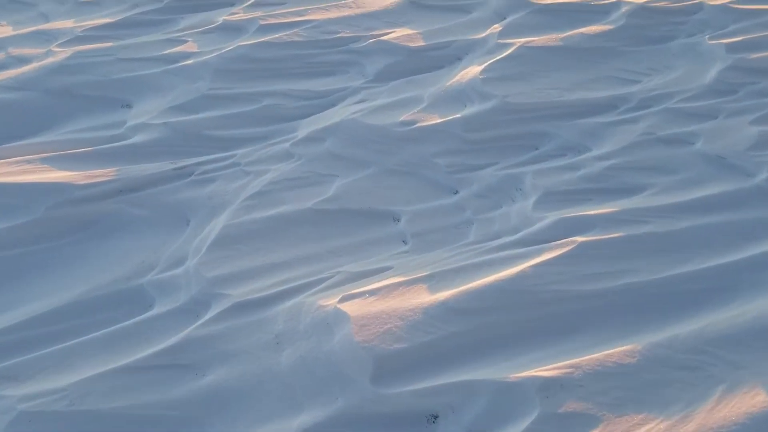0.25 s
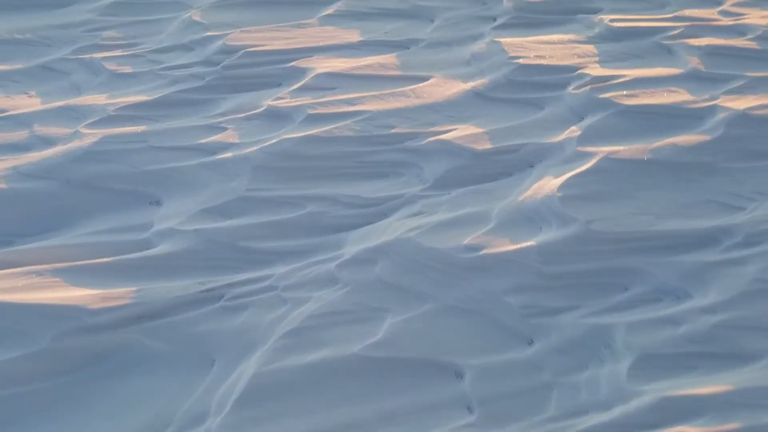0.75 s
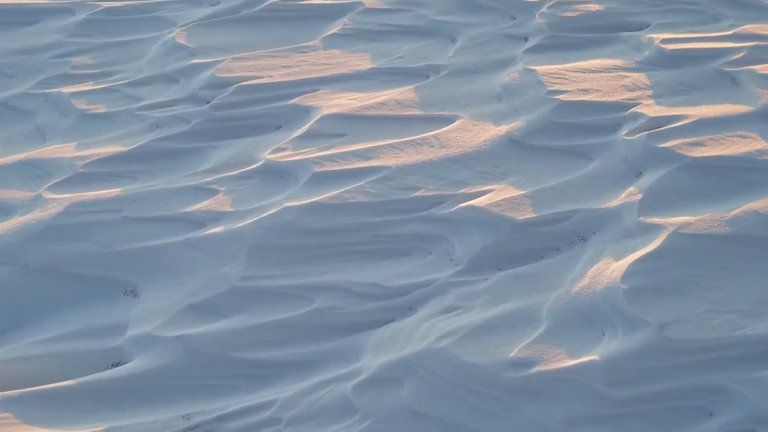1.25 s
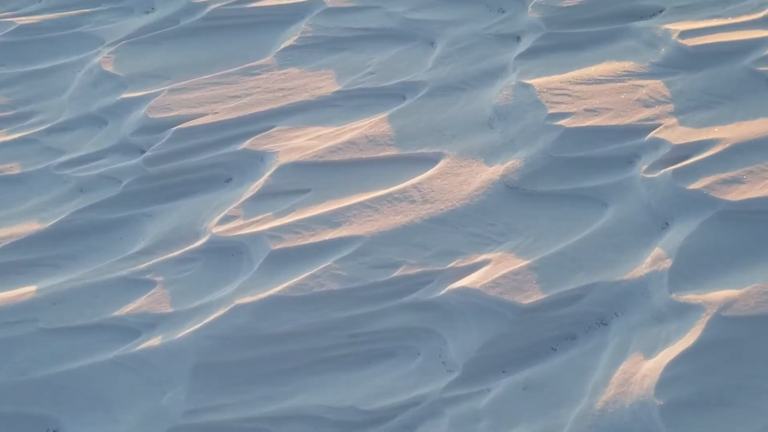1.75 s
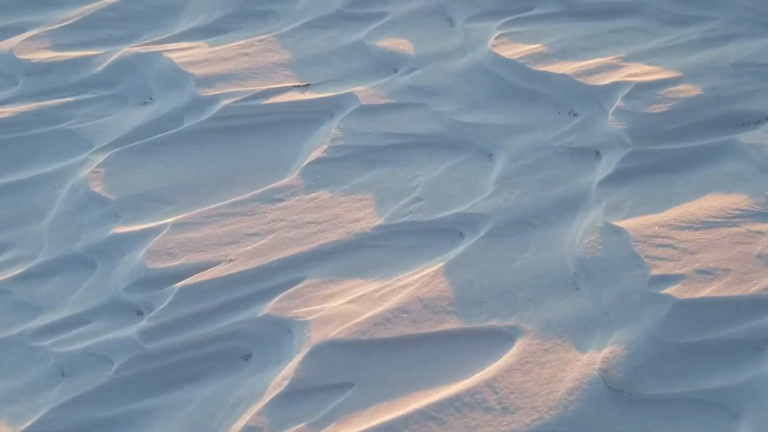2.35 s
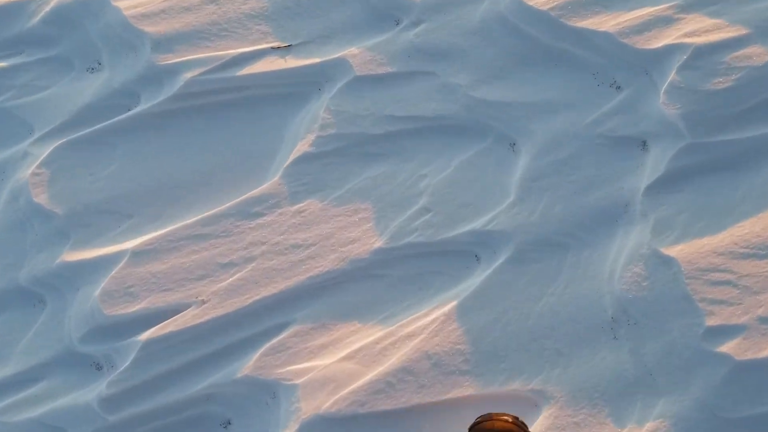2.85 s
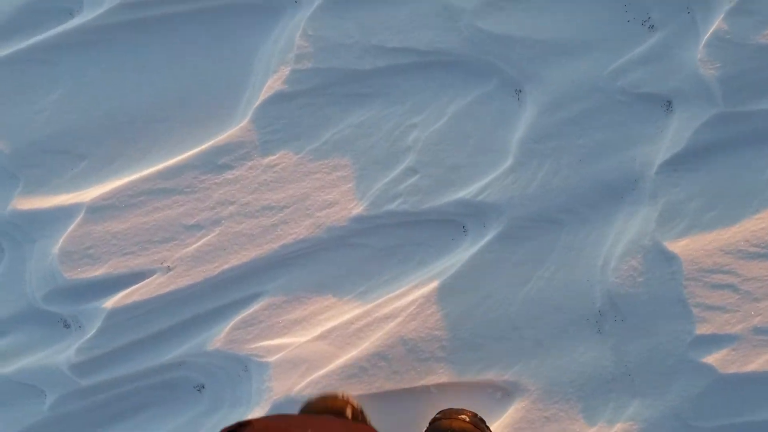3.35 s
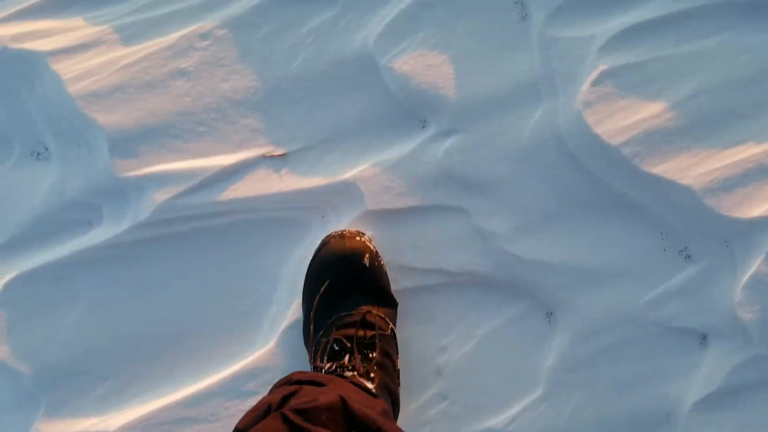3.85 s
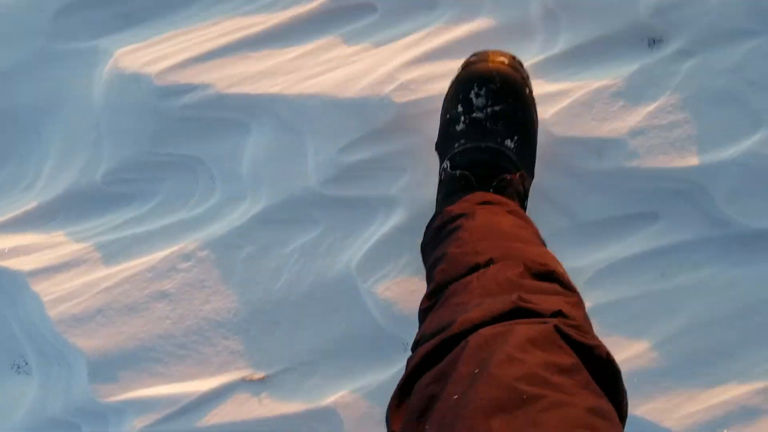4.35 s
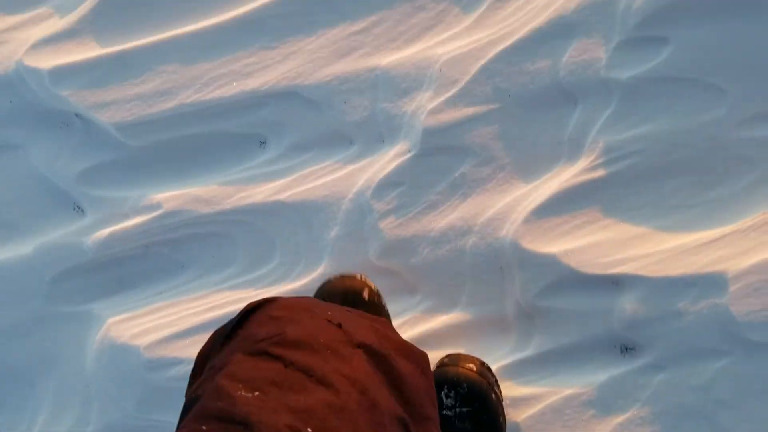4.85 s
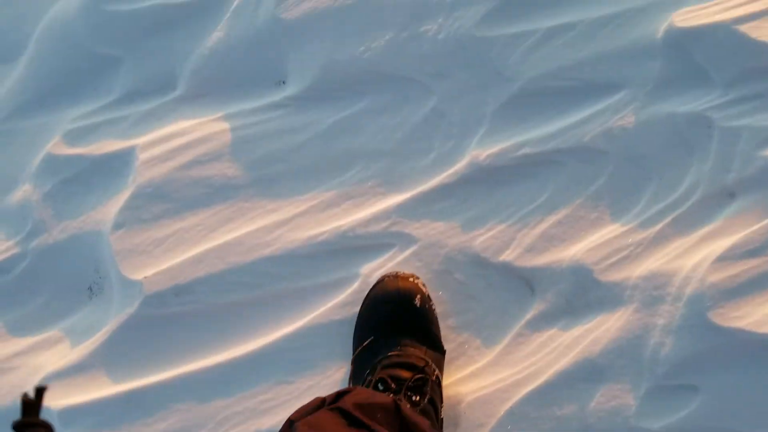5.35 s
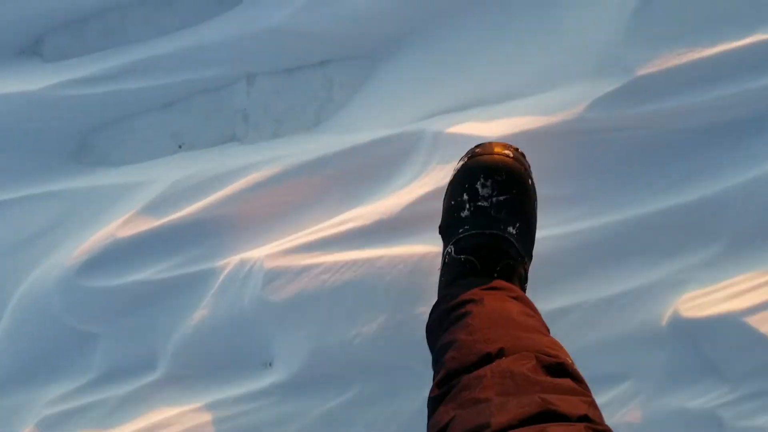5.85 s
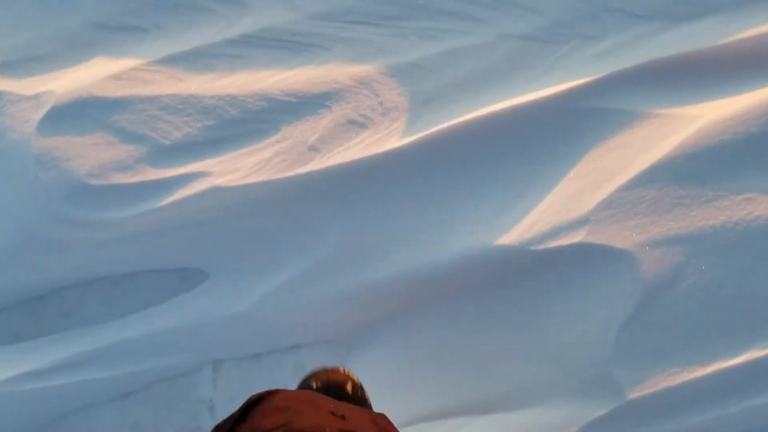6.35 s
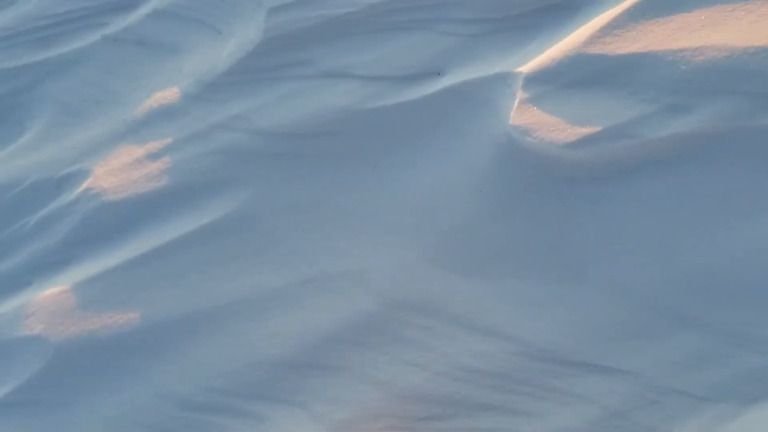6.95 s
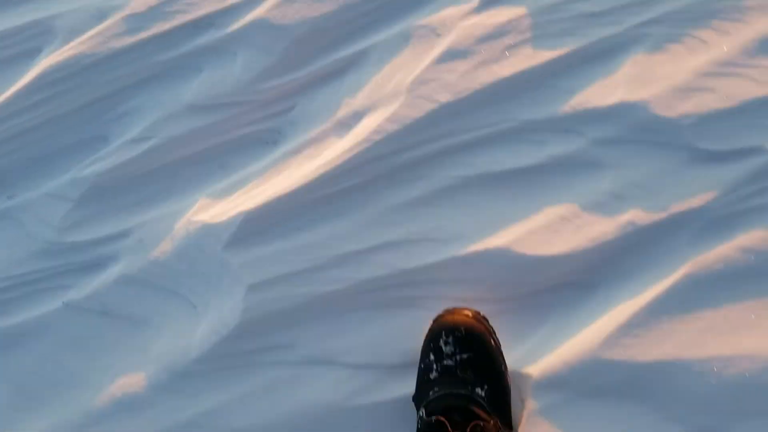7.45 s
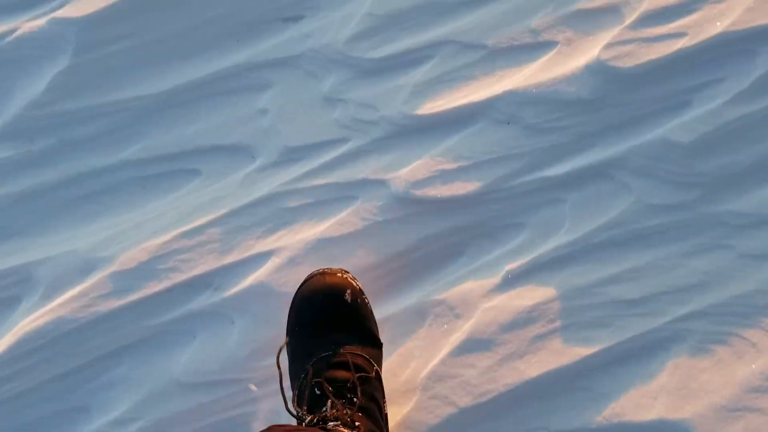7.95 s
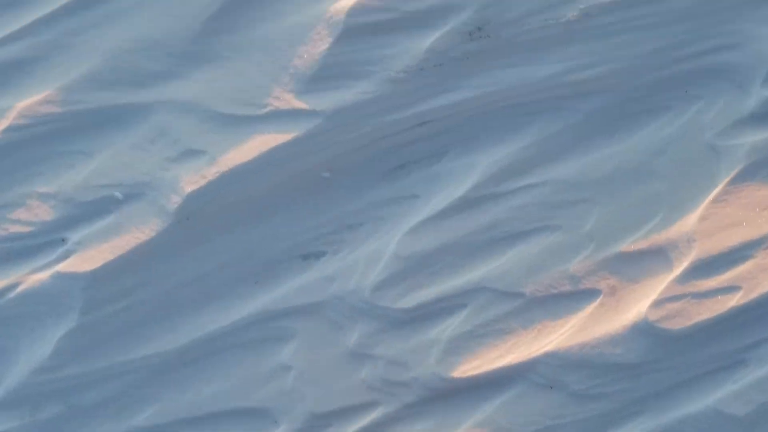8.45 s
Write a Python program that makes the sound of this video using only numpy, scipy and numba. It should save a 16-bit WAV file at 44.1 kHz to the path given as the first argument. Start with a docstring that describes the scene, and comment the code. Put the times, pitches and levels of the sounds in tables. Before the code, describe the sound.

Someone walks at a slow, steady pace over hard, wind-packed snow. Each boot breaks the crust in small snapping jerks, then grinds down with a squeaky crunch, a crisp hiss of crystals and a soft thud. The squeaks rise in pitch in the later steps as the snow gets firmer. The sound is close, in stereo, in quiet open air with no echo.

```python
"""Slow, squeaky crunching of boots on hard wind-packed snow in bitter cold.
Under each boot the crust gives way in short jerks and longer grinding slides. Breaking crystals hiss
and rasp, the slab squeaks at a pitch that climbs as the snow gets firmer, and the weight thuds softly.
Open air, no echo; stereo through two microphone ports."""
import sys
import numpy as np
from scipy import signal
from scipy.fft import rfft, irfft, next_fast_len
from scipy.io import wavfile
from scipy.ndimage import map_coordinates
from numba import njit

SR = 44100
rng = np.random.default_rng(int(sys.argv[2]) if len(sys.argv) > 2 else 0)


def to_wav(s):
    """Save 16-bit WAV."""
    ch = np.atleast_2d(s).T  # columns
    pcm = np.round(np.clip(ch, -1, 1) * 32767)  # PCM
    wavfile.write(sys.argv[1], SR, pcm.astype(np.int16))


N = 384552

# slab under the boot: t/s, squeak f/Hz, overtone gain/dB, rasp gain/dB, thud gain/dB
SNOW_SLAB = [(0, 380, -7.5, 4.5, 3), (.95, 540, -4.5, 7, 1.5), (1.4, 470, -4, 3, -3),
             (2.7, 582, -3.5, -1, -5.5), (3.08, 463, -2.5, -4, -5.5), (3.8, 550, -3, -2.5, -4.5),
             (4.4, 572, -7, 0, -2), (5.1, 564, -6, 1.5, -2), (5.3, 760, -39, 5, -6),
             (5.88, 792, -26, 0, -0.5), (6.1, 933, -17, 0.5, -6.5), (6.55, 993, -4, 5, -4),
             (6.7, 1190, -43, -3.5, -7), (6.85, 1130, -23, 7.5, -20), (7.1, 1170, -34, 6, -13),
             (7.46, 1550, -25, -2, -3), (7.53, 1700, -22, -2, -12.5), (8.15, 1756, -13, 2, -9.5),
             (8.72, 1730, -37, -5, -6)]


def amp(db):
    """dB to gain."""
    return 10 ** (np.asarray(db) / 20)


def unit(x):
    """Scale to rms 1."""
    return x / np.sqrt(np.mean(x ** 2) + 1e-20)


def along(points, hz):
    """Interpolate (f/Hz, value) points on a log axis."""
    f, values = np.transpose(points)
    return np.interp(np.log(hz + 1), np.log(f + 1), values)


def curves(rows):
    """Per-sample curve for each column after t/s."""
    times, *columns = np.transpose(rows)
    return [np.interp(np.arange(N) / SR, times, column) for column in columns]


def filtered(x, response):
    """Apply a complex frequency response."""
    size = next_fast_len(N + SR // 2)
    return irfft(rfft(x, size) * response(np.fft.rfftfreq(size, 1 / SR)), size)[..., :N]


def colour(x, spectrum):
    """Shape by (f/Hz, level/dB) points, rms 1."""
    return unit(filtered(x, lambda f: amp(along(spectrum, f))))


def smooth(x, pole):
    """One-pole low-pass."""
    return signal.lfilter([1 - pole], [1, -pole], x)


def wobble(rate_hz):
    """Smooth random curve."""
    return map_coordinates(rng.standard_normal(N // 10), [np.arange(N) * rate_hz / SR])


def grains(rate_hz, spread_db):
    """Two independent noises (mid, side) under one lumpy envelope."""
    return unit(amp(spread_db * wobble(rate_hz)) * rng.standard_normal((2, N)))


@njit
def two_pole(x, a1, a2):
    """Band-pass with per-sample coefficients."""
    y = np.zeros_like(x)
    for c in range(x.shape[0]):
        for i in range(2, x.shape[1]):
            y[c, i] = (1 - a2[i]) / 2 * (x[c, i] - x[c, i - 2]) + a1[i] * y[c, i - 1] - a2[i] * y[c, i - 2]
    return y


def resonate(x, hz, q, knocks=0):
    """Two-stage moving resonance, near unit gain for white noise; knocks skip stage one to ring at once."""
    radius = np.exp(-np.pi * hz / q / SR)
    a1, a2 = (1 + radius ** 2) * np.cos(2 * np.pi * hz / SR), radius ** 2
    return two_pole(two_pole(x, a1, a2) + knocks, a1, a2) * np.sqrt(2 * SR * q / (np.pi * hz))


def breaking_crust(slab_hz):
    """Crust gives way under the boot: hiss envelope, squeak drive envelope, snap impulses."""
    # sudden jerks: t/s, length/ms, hiss/dB, drive re hiss/dB
    jerks = [(0.017, 22, -39.5, 10.5), (0.046, 14, -36.5, 10), (0.278, 8.8, -42.5, 9),
             (0.359, 28, -41.5, 14), (0.0, 21, -47, -2.5), (0.553, 7.3, -43.5, -5), (0.604, 9.7, -42.5, 12),
             (0.686, 21, -41.5, 6), (0.723, 23, -39.5, 6), (1.183, 15.5, -35.5, -17), (1.208, 14, -36.5, 8),
             (1.234, 26, -40, 10.5), (1.278, 19, -37.5, 9), (1.316, 8.5, -46.5, 12),
             (1.334, 16, -37.5, 7.5), (1.375, 10, -35, 4.5), (1.455, 22, -36, 5), (1.767, 35, -38, 14),
             (2.423, 15, -36.5, 8), (2.449, 5.3, -37, 11.5), (2.477, 8.1, -47.5, 9), (2.605, 22, -49.5, 5),
             (2.649, 15, -48, 5), (2.671, 8.2, -39, 7.5), (2.725, 7.9, -35, 4.5), (2.769, 15, -34.5, 2),
             (2.802, 22, -35, 6), (2.83, 22, -32.5, 3), (2.856, 23, -33, 2), (2.885, 25, -31, -3),
             (2.914, 17, -32, 2), (2.936, 21, -35, 10), (3.459, 13, -47.5, -14), (3.481, 33, -35.5, 7.5),
             (3.849, 14, -30, 10.5), (3.911, 5, -48.5, 5), (3.927, 6.2, -38, -19), (4.075, 10, -57.5, 8),
             (4.124, 7.2, -56.5, 8), (4.292, 8.2, -41.5, -3), (4.626, 1.8, -50, -4), (4.65, 14, -36, 12.5),
             (4.716, 22.5, -39, 10), (4.749, 26, -38, 13.5), (4.784, 25, -36, 10.5),
             (4.808, 23, -36.5, 17.5), (4.85, 21.6, -35.5, 13.5), (4.887, 17, -35, 9),
             (4.945, 16, -35, 5.5), (4.982, 28, -35, 8.5), (5.397, 9, -33, 7), (5.426, 8.2, -35, 13.5),
             (5.445, 39, -34.5, 17), (5.49, 31, -30, 8.5), (5.534, 3.4, -32, 4), (5.563, 6.4, -34, 4),
             (5.614, 9.5, -34, 3), (5.669, 7.8, -32.5, 4), (5.706, 12, -36, 6.5), (5.806, 6.5, -45, 4),
             (5.825, 11, -35, 4), (5.868, 13, -33, 6.5), (5.884, 9.2, -34, 9.5), (6.192, 3, -36, 2),
             (6.321, 2, -44.5, -2.5), (6.371, 3, -43, -5), (6.4, 2.7, -41, -4), (6.444, 2.3, -38.5, 1.5),
             (6.475, 3.5, -38.5, 5), (6.495, 21, -38.5, 9.5), (6.523, 44, -34, 5.5),
             (6.703, 3, -28.5, 10.5), (6.731, 3, -33, 13.5), (6.827, 3, -38, 12), (6.931, 18.5, -33.5, 9),
             (7.037, 3, -55, 3), (7.078, 18, -34.5, 9.5), (7.122, 30.5, -32.5, 9), (7.166, 13.5, -31.5, 1),
             (7.196, 18, -33.5, 7), (7.233, 26, -34.1, 7.5), (7.274, 18.5, -33, 5), (7.304, 28, -33, 4),
             (7.666, 4.2, -46, -6), (7.682, 4.3, -43, 3), (7.7, 8, -33.5, 7), (7.788, 9.8, -33, 9),
             (7.808, 9.5, -44, 2), (7.823, 18, -32, 1), (7.843, 10, -33.5, 13.5), (7.875, 15, -32.5, 9.5),
             (7.888, 13, -35, 9.5), (7.92, 8.6, -33.5, 6), (7.951, 11, -30, 3), (7.987, 9.3, -36.5, 6),
             (8.018, 8, -45, 11), (8.043, 7.1, -41, 9), (8.214, 8.8, -33.5, 5), (8.24, 7.2, -34.5, -1),
             (8.26, 4.5, -35.5, 3.5), (8.276, 9.7, -39.5, -1), (8.295, 5.3, -36.5, 9.5),
             (8.316, 7.3, -34.5, -1.5), (8.336, 6.2, -34.5, 5), (8.36, 8.8, -36, 8.5),
             (8.393, 4.9, -34, 3.5), (8.424, 6.4, -36, 5.5), (8.506, 6.6, -35, -0.5), (8.531, 9, -36, 5.5),
             (8.583, 9.6, -33.5, -3), (8.608, 6.8, -34, 1.5)]
    # slides under full weight: t/s, swell/s, length/s, hiss/dB x3, drive re hiss/dB x3 (entry, peak, end)
    slides = [(0.044, .1, 0.22, -41, -39, -41, 6.5, 12, 18),
              (0.285, 0.028, 0.052, -41.5, -38.5, -39.5, 16, 12.5, 11.5),
              (0.69, 0.11, 0.3, -54.5, -37.5, -42, 20, 6, 5),
              (0.906, 0.037, 0.27, -40.5, -40.5, -42, -2, 14, 15),
              (1.356, 0.089, 0.087, -42.5, -37.5, -39.5, 2, 9, 8),
              (1.473, 0.035, 0.24, -45.5, -35, -39.5, 17, 3.5, 14.5),
              (2.115, 0.04, 0.29, -42, -35, -36.5, 11, -0.5, 15.5),
              (2.965, 0.081, .16, -36, -34, -39, 10, 5.5, 16),
              (3.523, 0.24, 0.3, -38.5, -31.5, -36.5, 9.5, 1, 12),
              (4.303, 0.045, 0.27, -42, -33, -38, 13.5, 2, 15),
              (5.02, 0.17, 0.35, -37.5, -35.5, -34.5, 10.5, 6.5, 10.5),
              (5.896, 0.12, 0.25, -34, -30.5, -37.5, -3, 5.5, 14),
              (6.575, 0.12, .33, -37, -28.5, -35.5, 2, -1.5, 6),
              (7.336, 0.15, 0.17, -38.5, -29.5, -35, 8, -26, -8),
              (7.509, 0.043, 0.12, -35, -34.5, -35, 4, 5.5, 10),
              (7.705, 0.03, 0.068, -32, -35.5, -36, 1, 8.5, 7.5),
              (7.959, 0.3, 0.232, -36, -30.5, -31.5, -18, 3, 12.5),
              (8.621, 0.076, .2, -36, -33, -14, -14, -27, -30)]
    # unloaded boot brushing the surface: centre t/s, half length/s, hiss/dB
    brushes = [(1.811, 0.068, -46.5), (2.11, 0.012, -54), (2.536, 0.051, -49.5), (3.288, 0.073, -45),
               (3.96, 0.096, -50.5), (4.288, 0.022, -54), (6.253, 0.04, -49), (6.293, 0.026, -50.5),
               (8.395, 0.079, -47.5)]
    # rows: hiss, drive
    rise_s = np.array([[.0005], [.0004]])
    sag_t60_s, fade_t60_s = np.array([[.5], [.12]]), np.array([[.022], [.06]])
    power = np.zeros((2, N + SR))

    def add_break(start_s, t, level_db, decay_db):
        shape = (1 - np.exp(-t / rise_s)) * amp(-decay_db)
        power[:, round(start_s * SR):][:, :len(t)] += (amp(level_db) * shape) ** 2

    t = np.arange(SR) / SR
    for start_s, swell_s, length_s, entry_db, peak_db, end_db, *above_db in slides:
        stages_s = [0, min(swell_s, length_s), length_s]
        hiss_db = np.interp(t, stages_s, [entry_db, peak_db, end_db])
        drive_db = hiss_db + np.interp(t, stages_s, above_db)
        add_break(start_s, t, [hiss_db, drive_db], 60 * np.maximum(t - length_s, 0) / fade_t60_s)
    power[:, :N] *= amp(1.2 * wobble(55)) ** 2  # sole judders on the crust

    snaps = np.zeros((2, N))  # rows: mid, side; one push opens each jerk, mid only
    snap_db, snap_lag_s = 20, .0013
    t = t[:SR // 4]
    for start_s, length_ms, hiss_db, above_db in jerks:
        held_s = np.minimum(t, length_ms / 1000)
        drive_db = hiss_db + above_db
        add_break(start_s, t, [[hiss_db], [drive_db]], 60 * (held_s / sag_t60_s + (t - held_s) / fade_t60_s))
        snaps[0, round((start_s + snap_lag_s) * SR)] = amp(drive_db + snap_db)

    # crumbs trickle after each break; drifting crystals set the floor
    crumb_db, crumb_t60_s, drift_db = -14.5, .64, -63
    hiss_power, drive_power = power[:, :N]
    trickle = smooth(hiss_power, pole=amp(-60 / (crumb_t60_s * SR)) ** 2)
    crumbs = amp(crumb_db) ** 2 * trickle + amp(drift_db) ** 2
    hiss_power += crumbs
    drive_power += crumbs * amp(-1.5 - 7.5 * np.log2(slab_hz / 600)) ** 2  # firm slab hardly rings
    t = np.arange(N) / SR
    for centre_s, half_s, hiss_db in brushes:
        hiss_power += amp(hiss_db) ** 2 * np.exp(-((t - centre_s) / half_s) ** 4)
    return np.sqrt(hiss_power), np.sqrt(drive_power), snaps


def crystal_hiss(hiss):
    """Fine crystals break: bright, even noise."""
    # hiss spectral density: f/Hz, level/dB
    spectrum = [(1290, -48), (2200, -9.5), (2840, -8), (3980, -6), (4840, -12.5), (7310, -10), (8470, -17),
                (9910, -11.5), (11400, -3.5), (12700, -7), (13400, -9.5), (15700, -19.5)]
    return amp(-1.5) * hiss * colour(grains(500, spread_db=.5), spectrum)


def grain_rasp(hiss, drive, slab_hz):
    """Uneven grains break; under load they ring a sole rib whose pitch jumps about."""
    # rasp spectral density: f/Hz, level/dB
    spectrum = [(150, -19.5), (350, -3.5), (1000, -1), (1600, 0), (2300, 0), (2900, -7), (5000, -19)]
    rasp = colour(grains(350, spread_db=2.5), spectrum)
    load = np.minimum(drive / hiss, 1) ** 2
    rib = resonate(grains(250, spread_db=2), hz=1700 * 2 ** (.22 * wobble(60)), q=4)
    rasp += amp(-5) * load * rib
    low = filtered(rasp, lambda f: 1 / (1 + (f / 950) ** 8))
    low_gain = np.minimum(650 / slab_hz, 1) ** 1.16  # firm snow loses the lows
    return hiss * (rasp - low + low * low_gain)


def small_cracks(drive, rate_hz, gain_db):
    """Random impulses all through the breaking, mid only."""
    chance, size = rng.random((2, N))
    impulses = drive * amp(gain_db) * (chance < rate_hz / SR) * (2 * size - .5)
    return np.array([impulses, np.zeros(N)])


def slab_squeak(drive, snaps, hz, overtone_db):
    """Breaking rings the slab and a broad overtone; firmer snow is higher and purer."""
    q = 2.78 * (hz / 600) ** .71
    squeak = resonate(amp(-1.5) * drive * grains(120, spread_db=2), hz, q, knocks=-snaps)
    overtone_drive = amp(overtone_db) * (drive * grains(150, spread_db=1.5) - snaps)
    return squeak + resonate(overtone_drive, 2.47 * hz, q=1.01)


def boot_thud(hiss):
    """The boot's weight follows the breaking sluggishly: low noise."""
    # thud spectral density: f/Hz, level/dB
    spectrum = [(15, -44), (25, -13.5), (81, 3), (213, -5.5), (352, -4.5), (399, -8.5), (500, -9),
                (650, -7), (1100, -120)]
    lag_s = .0034
    weight = np.sqrt(smooth(hiss ** 2, pole=np.exp(-1 / (lag_s * SR))))
    return weight * colour(grains(30, spread_db=3), spectrum)


def crust_drop(snaps, hz):
    """The crust drops as it snaps: a short, unpitched pull of air."""
    return filtered(snaps, lambda f: -1j * f * hz / (hz ** 2 - f * f + 1j * f * hz))


def sinking_squeals():
    """Narrow bands of grainy noise swell and fade as the weight sinks in."""
    # brief squeals: centre t/s, half length/s, f/Hz, level/dB
    squeals = [(0.938, 0.042, 1300, -27), (0.953, 0.036, 1880, -29), (3.067, 0.025, 1180, -24.5),
               (7.529, .012, 1600, -31), (3.773, 0.045, 623, -23), (5.274, 0.028, 760, -22),
               (6.3, 0.018, 2200, -30), (6.1, 0.062, 1950, -26.5), (6.84, 0.045, 884, -30.5),
               (8.17, 0.039, 1950, -32)]
    t = np.arange(N) / SR
    sound = np.zeros((2, N))
    for centre_s, half_s, hz, level_db in squeals:
        swell = amp(level_db) * np.exp(-((t - centre_s) / half_s) ** 2)
        sound += swell * resonate(grains(100, spread_db=1), np.full(N, float(hz)), q=5.6)
    return sound


def scene():
    """Footstep layers, mid/side to left/right: alike in the bass, unrelated in the treble."""
    # left-right likeness: f/Hz, correlation/1
    likeness = [(60, 0.97), (300, 0.94), (700, 0.95), (1400, 0.23), (2800, 0.11), (6000, 0.021)]
    slab_hz, overtone_db, rasp_db, thud_db = curves(SNOW_SLAB)
    hiss, drive, snaps = breaking_crust(slab_hz)
    boots = crystal_hiss(hiss) + amp(rasp_db) * grain_rasp(hiss, drive, slab_hz)
    squeak_hz = slab_hz + 45 * wobble(25)  # loaded patch of slab changes
    snaps += small_cracks(drive, rate_hz=70, gain_db=15)
    snaps *= np.minimum(700 / squeak_hz, 1) ** .7  # firm snow snaps less
    boots += slab_squeak(drive, snaps, squeak_hz, overtone_db)
    boots += amp(thud_db) * boot_thud(hiss)
    boots += amp(-12) * crust_drop(snaps, hz=1400)
    boots += sinking_squeals()
    angle_rad = lambda f: np.arccos(along(likeness, f)) / 2
    mid, side = filtered(boots, lambda f: np.array([np.cos(angle_rad(f)), np.sin(angle_rad(f))]))
    return np.array([mid + side, mid - side])


def record(dry):
    """Two microphone ports, each with its own colour and lag; bass cut and band limit."""
    # port balance: f/Hz, left minus right level/dB
    balance = [(60, 1), (300, 2.5), (800, 2), (1400, -4.5), (2500, -3), (4000, -3), (5500, 4.5),
               (7300, 9.5), (8700, 1.5), (11000, -1.5), (13000, 12.5), (15000, 12)]
    # port phase: f/Hz, left lead/rad
    lead = [(300, 0), (950, -.6), (1800, .2)]
    bass_hz, top_hz = 28, 15800
    split = np.array([[.5], [-.5]])
    ports = lambda f: amp(split * along(balance, f)) * np.exp(1j * split * along(lead, f))
    bass_cut = lambda f: (1j * f / (bass_hz + 1j * f)) ** 2
    return filtered(dry, lambda f: ports(f) * bass_cut(f) * (f < top_hz))


dry = scene()
out = record(dry)
to_wav(out)
```